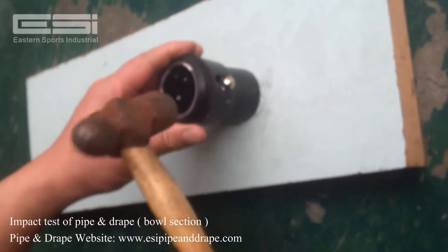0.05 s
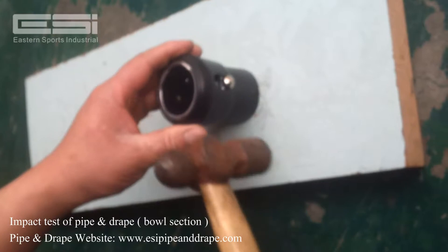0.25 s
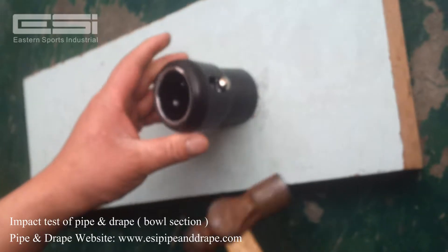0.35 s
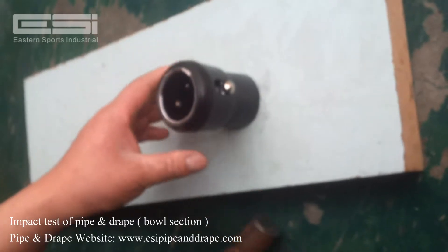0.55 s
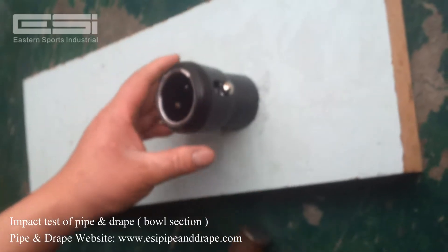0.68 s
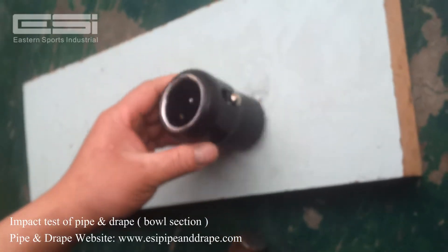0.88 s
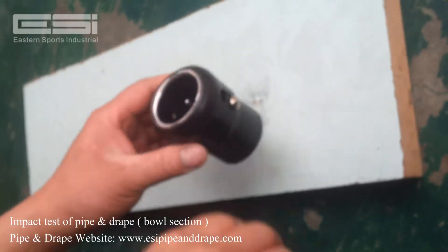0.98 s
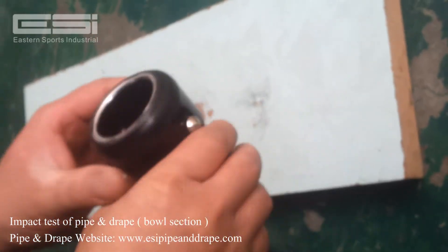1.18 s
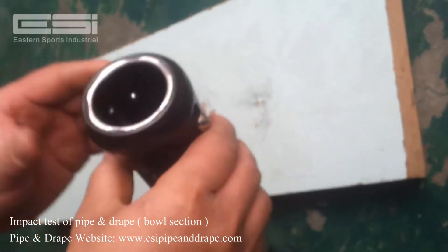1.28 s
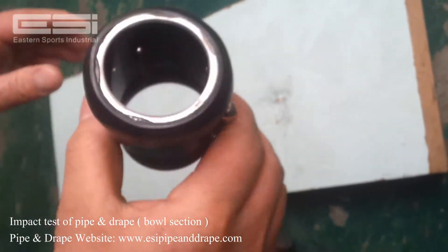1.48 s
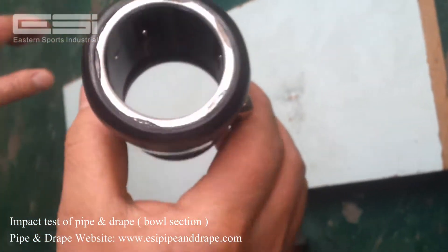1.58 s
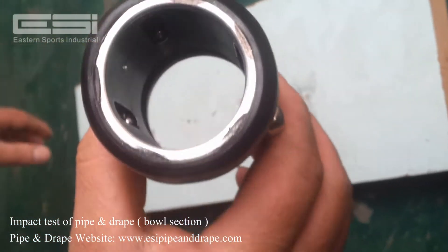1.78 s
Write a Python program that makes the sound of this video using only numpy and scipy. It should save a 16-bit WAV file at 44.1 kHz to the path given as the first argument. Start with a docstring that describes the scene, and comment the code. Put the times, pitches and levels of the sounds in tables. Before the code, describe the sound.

A hammer bangs once on a board, followed by light metallic clinks in an echoing workshop.

```python
"""One very loud hammer knock on a board echoes through a workshop, over the hum of machines.
A steel pipe fitting is then rocked and picked up: it bumps the board, clinks, and its loose bolt ticks.
The impacts excite damped modes and bursts of noise, which the hall prolongs as reverberation.
The input of a small, close camera overloads on every strong hit."""
import sys
import numpy as np
from scipy import signal
from scipy.fft import rfft, irfft, next_fast_len
from scipy.io import wavfile
from scipy.ndimage import map_coordinates

SR = 44100
rng = np.random.default_rng(int(sys.argv[2]) if len(sys.argv) > 2 else 0)


def pcm_store(signal):
    """Save signal as 16-bit PCM."""
    levels = np.round(np.clip(np.atleast_2d(signal), -1, 1) * 32767)
    wavfile.write(sys.argv[1], SR, levels.astype(np.int16).T)


N = 81585
KNOCK_S = 0.2408

# Spectrum of the knock's broadband crash: frequency_hz, level_db
CRASH_SPECTRUM = [(30, -35), (100, -8), (300, -5), (550, -10), (850, -1), (1400, 0), (2300, 3.5), (3000, 2),
                  (4500, -2), (6000, 2.5), (8000, -8.5)]


def amp(db):
    """Decibels as an amplitude ratio."""
    return 10 ** (np.asarray(db) / 20)


def along(points, hz):
    """Interpolation of (frequency_hz, value) points on a logarithmic frequency axis."""
    point_hz, values = np.transpose(points)
    return np.interp(np.log(hz + 1), np.log(point_hz + 1), values)


def filtered(x, response):
    """Linear filtering: the spectrum of x is multiplied by a frequency response."""
    size = next_fast_len(x.shape[-1] + SR // 4)
    hz = np.fft.rfftfreq(size, 1 / SR)
    return irfft(rfft(x, size) * response(hz), size)[..., :x.shape[-1]]


def noise(spectrum, size):
    """Spectral shaping: white noise is coloured, then scaled to rms 1."""
    coloured = filtered(rng.standard_normal(size), lambda hz: amp(along(spectrum, hz)))
    return coloured / np.sqrt(np.mean(coloured ** 2) + 1e-20)


def wobble(knots_per_s):
    """Slow random modulation: a spline through random values."""
    return map_coordinates(rng.standard_normal(N // 100), [np.arange(N) * knots_per_s / SR])


def fade(t60_s):
    """Half a second of exponential decay, falling 60 dB in t60_s."""
    return np.exp(-np.log(1000) * np.arange(SR // 2) / SR / t60_s)


def burst(spectrum, t60_s):
    """A broadband transient: coloured noise under exponential decay."""
    return noise(spectrum, size=SR // 2) * fade(t60_s)


def ring(modes, attack_s, scatter_db=1, detune=0.003):
    """Modal superposition: damped sinusoids whose level and pitch vary a little at each blow."""
    t = np.arange(SR // 2) / SR
    vibration = 0
    for hz, db, t60_s in modes:
        gain = amp(db + scatter_db * rng.normal())
        pitch_hz = hz * (1 + detune * rng.normal())
        vibration += gain * fade(t60_s) * np.sin(2 * np.pi * pitch_hz * t)
    return (1 - np.exp(-t / attack_s)) * vibration


def at(start_s, x):
    """Pure delay: x begins at start_s."""
    return np.pad(x, (round(start_s * SR), N))[:N]


def stereo(mid, side, width_db=-21):
    """Sum and difference: a weak side signal gives a narrow stereo image."""
    return np.array([mid + amp(width_db) * side, mid - amp(width_db) * side])


def machines(air_db=-25, hum_db=-0.5, waver_db=3):
    """Steady broadband noise under hum lines with random amplitude and phase modulation."""
    # Spectrum of the workshop noise: frequency_hz, level_db
    air_spectrum = [(15, -40), (25, -14), (54, -8), (143, -1), (165, -0.5), (199, -4), (224, -6), (270, -4),
                    (413, -5), (562, -4), (632, -10.5), (859, -11.5), (1380, -14.5), (2370, -18.5),
                    (7000, -18.5), (9100, -77), (15400, -120)]
    # Tones of the machines: pitch_hz, level_db
    hum_lines = [(193.8, -35.5), (274.5, -45), (328.4, -37), (506.0, -37.5), (565.2, -40), (882.9, -44.5),
                 (1200, -46.5)]
    t = np.arange(N) / SR
    hum = 0
    for hz, db in hum_lines:
        rms = amp(db + waver_db * wobble(knots_per_s=7.4))
        phase = 2 * np.pi * (hz * t + rng.random()) + 0.3 * wobble(knots_per_s=9.57)
        hum += rms * np.sqrt(2) * np.sin(phase)
    air = stereo(noise(air_spectrum, size=N), noise(air_spectrum, size=N))
    return amp(air_db) * air + amp(hum_db) * hum


def hall_decay(noise_pair, t60_share=1, build_s=0.002):
    """A diffuse field builds up, then decays exponentially at a rate that depends on frequency."""
    # Reverberation time of the hall: frequency_hz, t60_s
    reverberation_times = [(100, 1), (500, 1.45), (2000, 1.22), (4000, 1.244), (7000, 0.9)]
    hz, t, spectra = signal.stft(noise_pair, SR, nperseg=256)
    t60_s = t60_share * along(reverberation_times, hz)[:, None]
    envelope = np.exp(-np.log(1000) * t / t60_s) * (1 - np.exp(-t / build_s))
    return signal.istft(spectra * envelope, SR, nperseg=256)[1][:, :N]


def stereo_spread(x, side_db=-15):
    """A faint, noise-smeared copy in the side channel gives a close sound slight stereo width."""
    # Spectrum of the side channel's smear: frequency_hz, level_db
    spread_spectrum = [(100, 2), (2000, -1), (4000, -3), (7000, 7.5)]
    smear = burst(spread_spectrum, t60_s=0.015)
    side = amp(side_db) * signal.fftconvolve(x, smear / np.linalg.norm(smear))[:N]
    return np.array([x + side, x - side])


def in_hall(start_s, x, wet_db=-11):
    """Convolution gives a small sound slight stereo width and a short diffuse tail."""
    tail = hall_decay(rng.standard_normal((2, SR * 3 // 4)), t60_share=0.38)
    mid, side = signal.fftconvolve(x[None], tail / np.linalg.norm(tail[0]), axes=1)
    return stereo_spread(at(start_s, x)) + amp(wet_db) * stereo(at(start_s, mid), at(start_s, side))


def hand_thumps():
    """Soft contact excites only low frequencies: each thump is one slowly rising mode."""
    # Padded contacts of hand and fitting: start_s, pitch_hz, level_db
    thumps = [(.577, 95, -17.5), (0.702, 226.5, -12.5), (1.452, 68, -31)]
    t60_s = 0.11
    return sum(at(start_s, ring([(hz, db, t60_s)], attack_s=0.015)) for start_s, hz, db in thumps)


def bolt_ticks():
    """Rattle across a clearance: the loose bolt strikes its hole in short, bright bursts."""
    # Impacts of the bolt: start_s, level_db
    ticks = [(0.6197, 3.5), (0.631, 6), (0.656, 4), (0.6858, -2), (1.4202, -16), (1.453, -17),
             (1.4632, -11.5), (1.483, -12.5), (1.4938, -6), (1.504, -36)]
    # Spectrum of one tick: frequency_hz, level_db
    tick_spectrum = [(100, -47), (500, -16), (2000, -16), (2800, -9), (3500, -8), (4600, -15), (5700, 7),
                     (6400, 0), (8000, -2.5)]
    return sum(in_hall(start_s, amp(db) * burst(tick_spectrum, t60_s=0.036)) for start_s, db in ticks)


def board_bumps():
    """Impact excitation: the rocking fitting sets off the board's heavily damped modes."""
    # Impacts of the fitting on the board: start_s, level_db
    bumps = [(.5725, -7.5), (.5765, -2.5), (.594, -14), (.62, -10), (.657, -4.5), (.696, -6.5), (.756, -10)]
    # Modes of the board: pitch_hz, level_db, t60_s
    board_modes = [(502.3, -10, 0.1), (628, 10, 0.015), (850, 9, 0.017), (1150, -2, 0.037),
                   (1447, -8, 0.069), (1626, 3.5, 0.022), (1887, 7, 0.026)]
    return sum(in_hall(start_s, amp(db) * ring(board_modes, attack_s=0.0013)) for start_s, db in bumps)


def fitting_clinks(ring_db=2.5, noise_db=-5.5):
    """Steel on steel clicks and rings; the point of contact decides how strongly each mode is excited."""
    # Steel contacts: start_s, contact_db, low_ring_db, middle_ring_db, high_ring_db
    clinks = [(.696, 10.5, 3.5, 4, -0.5), (.7228, 5, -4, -10, -21), (.7555, 5, -2, 2, -0.5),
              (.778, -23.5, -30, -6, -27), (.840, 11, -3.5, -14, 6.5), (.856, 12, -11, -8, 8),
              (.879, -16, -16, -6, -26), (.891, -8, -8, -24.5, -15), (.9315, 5.5, 3, -24, -14),
              (.9745, 11.5, -5.5, -5, 5.5), (.9968, 5, -2.5, -3, 0), (1.022, -12, -25, -5, -18),
              (1.0318, -2, -7.5, -7, -22), (1.047, 2, -3, -5, -21), (1.068, -2, -5, -2.5, -6.5),
              (1.086, 4.5, -7, -12, -30), (1.091, -4, -14.5, -9, 1), (1.113, -15, -12, -15, -25),
              (1.1408, -15.5, -16, -4, -15)]
    # Centres of the low, middle and high ring bands: frequency_hz
    band_hz = [2125, 3720, 5590]
    # Modes of the fitting, damped by the hand: pitch_hz, level_db, t60_s
    steel_modes = [(1078, -15.5, 0.063), (1230, -14.5, 0.034), (2118, -2.5, 0.049), (2730, -14, 0.072),
                   (3444, -7.5, 0.032), (3707, 1, 0.036), (3764, -12.5, 0.042), (4060, -13.5, 0.032),
                   (4800, -11, 0.038), (5571, 1, 0.026), (5575, -14, 0.063)]
    # Spectrum of the contact noise: frequency_hz, level_db
    contact_spectrum = [(100, -20), (400, -1), (1200, 4), (2500, 5.5), (3300, 7), (4300, 4), (5500, 6),
                        (8000, -4)]
    click_mode = (3782, 4.5, 0.0071)  # pitch_hz, level_db, t60_s
    out = np.zeros((2, N))
    for start_s, contact_db, *band_db in clinks:
        modes = [(hz, db + ring_db + np.interp(hz, band_hz, band_db), t60_s)
                 for hz, db, t60_s in steel_modes]
        click = ring([click_mode], attack_s=0.00067, detune=0.067)
        contact = click + amp(noise_db) * burst(contact_spectrum, t60_s=0.019)
        out += in_hall(start_s, ring(modes, attack_s=0.0015) + amp(contact_db) * contact)
    return out


def hammer_reverberation(level_db=4):
    """The knock fills the hall with a diffuse field that starts with the colour of its crash."""
    mid, side = hall_decay(np.array([noise(CRASH_SPECTRUM, size=N), noise(CRASH_SPECTRUM, size=N)]))
    return amp(level_db) * stereo(at(KNOCK_S, mid), at(KNOCK_S, side))


def hammer_knock(level_db=18, crash_db=6, slap_s=0.048, slap_db=-14):
    """A hard impulse excites modes and broadband noise; one wall returns it as a slap echo."""
    # Modes of hammer and board: pitch_hz, level_db, t60_s
    knock_modes = [(852, -8.5, 0.065), (1292, 0.5, 0.07), (1391, -18, 0.087), (1500, -11.5, 0.24),
                   (1680, -7, 0.098), (1865, -6.5, 0.11), (2212, -6.5, 0.13), (2342, -4, 0.11),
                   (2420, -29, 0.36), (2838, -10.5, 0.16), (3740, 6, 0.027)]
    snap_mode = (4463, 7.5, 0.022)
    thud_mode = (51.3, -29, 0.46)  # the board on the floor
    blow = ring(knock_modes, attack_s=0.00048)
    blow += amp(crash_db) * burst(CRASH_SPECTRUM, t60_s=0.1)
    blow += ring([snap_mode, thud_mode], attack_s=0.00074)
    return amp(level_db) * (at(KNOCK_S, blow) + amp(slap_db) * at(KNOCK_S + slap_s, blow))


def scene():
    """Superposition of the close knock and handling with the hall and its machines."""
    knock = stereo_spread(hammer_knock()) + hammer_reverberation()
    handling = board_bumps() + hand_thumps() + fitting_clinks() + bolt_ticks()
    return knock + handling + machines()


def record(dry):
    """Saturation rounds the peaks; spectral imaging from coarse sampling mirrors the treble upward."""
    # Frequency response of the input: frequency_hz, gain_db
    input_response = [(20, 0.5), (60, 4.5), (3000, 0.5), (5600, -3), (6300, -5.5), (7000, -10.5),
                      (7500, -14), (8000, -35)]
    overload, knee, full_scale = 0.92, 5, 0.955
    sampling_hz, top_hz, mirror_db = 16000, 10510, 2
    nyquist_hz = sampling_hz / 2
    saturated = dry / (1 + np.abs(dry / overload) ** knee) ** (1 / knee)
    band = filtered(saturated, lambda hz: amp(along(input_response, hz)) * (hz < nyquist_hz))
    images = band * 2 * np.cos(2 * np.pi * sampling_hz * np.arange(N) / SR)
    mirror = filtered(images, lambda hz: (sampling_hz / np.maximum(hz, nyquist_hz) - 1) ** 2)
    limited = np.clip(band + amp(mirror_db) * mirror, -full_scale, full_scale)
    return filtered(limited, lambda hz: hz < top_hz)


dry = scene()
out = record(dry)
pcm_store(out)
```